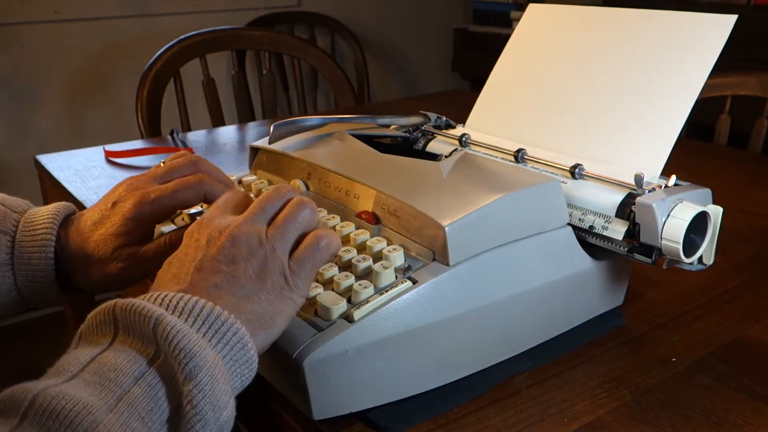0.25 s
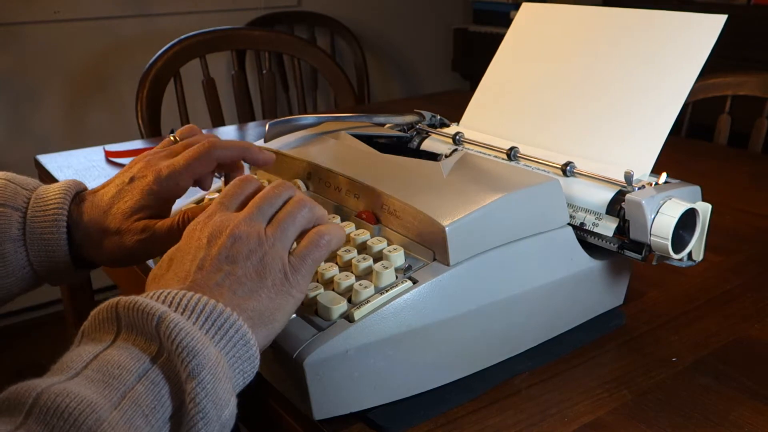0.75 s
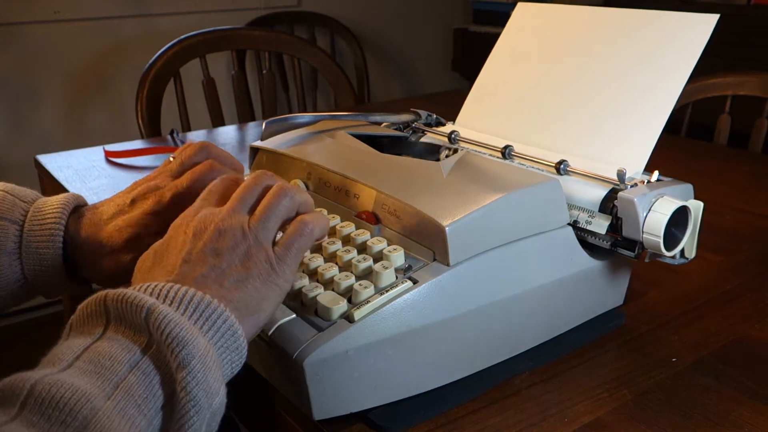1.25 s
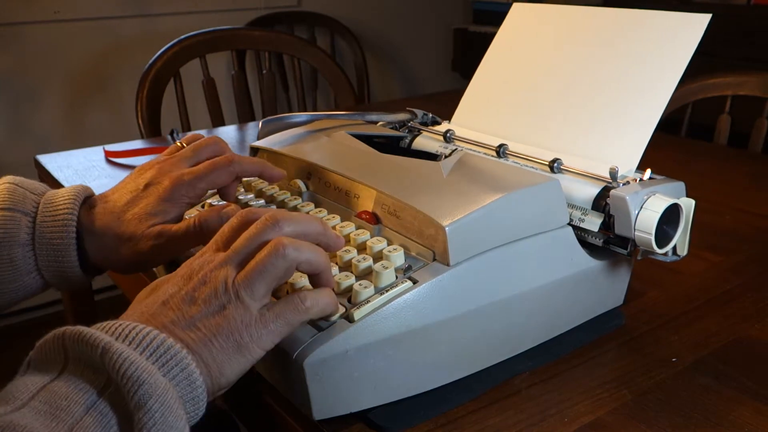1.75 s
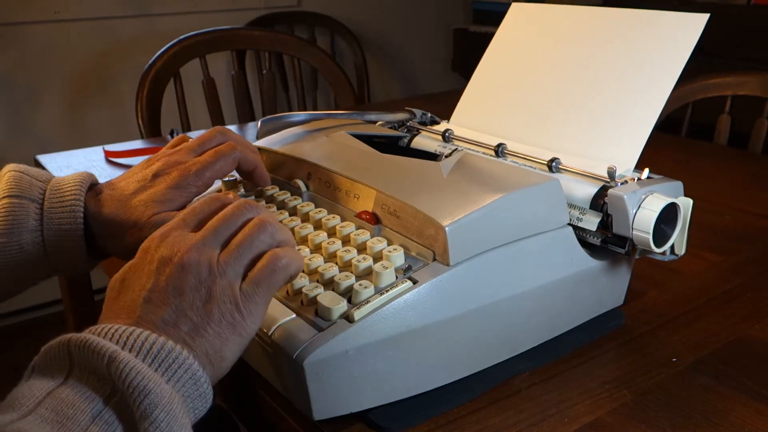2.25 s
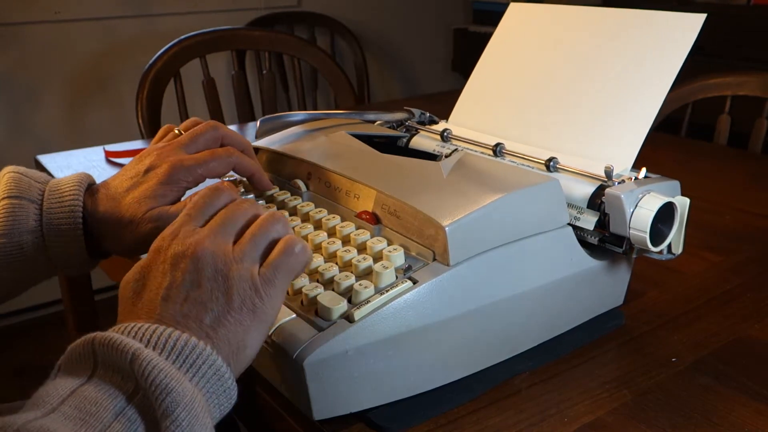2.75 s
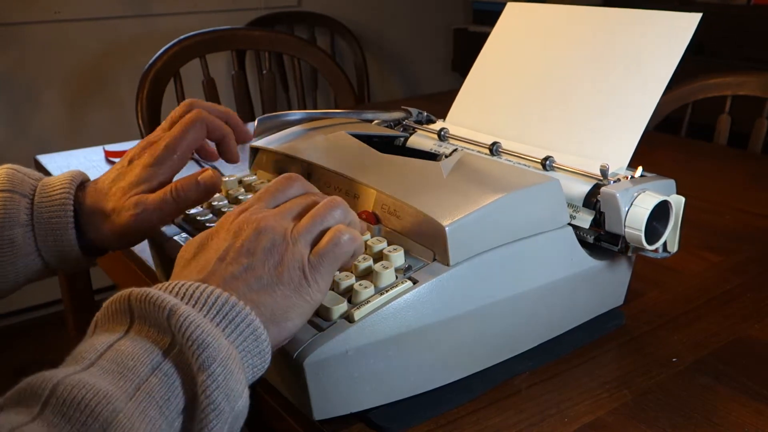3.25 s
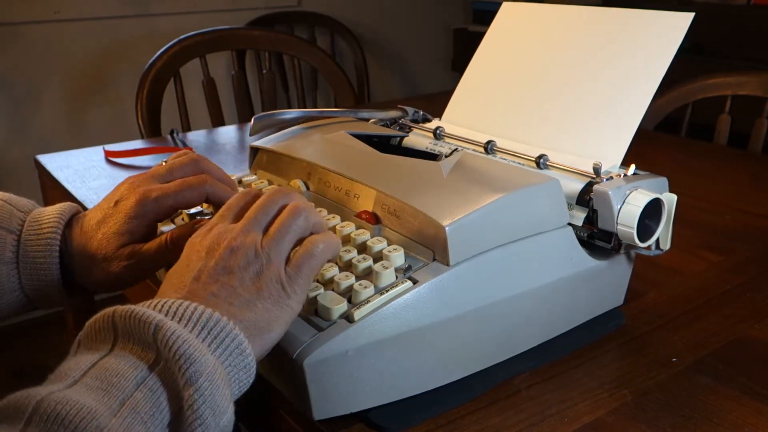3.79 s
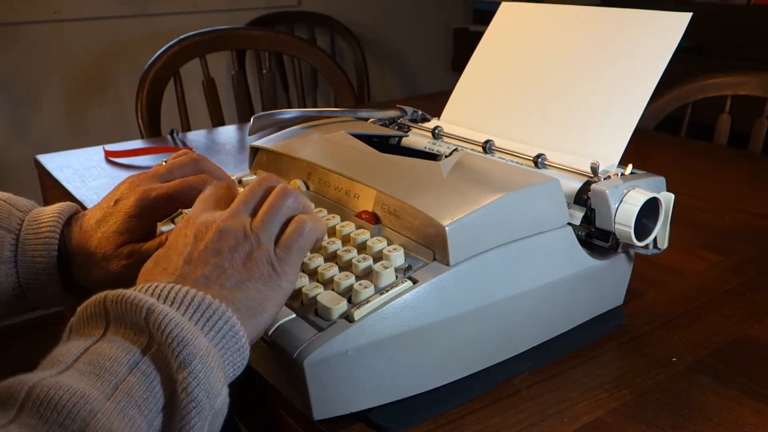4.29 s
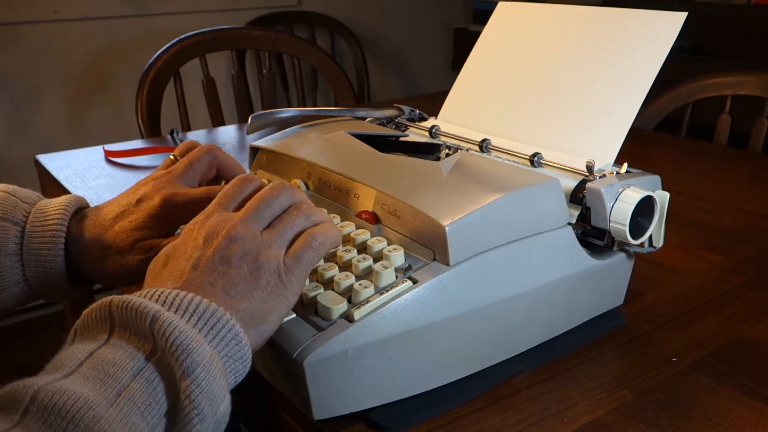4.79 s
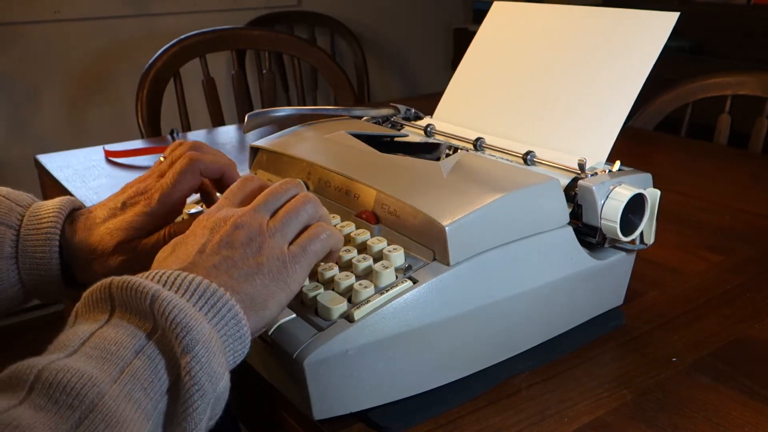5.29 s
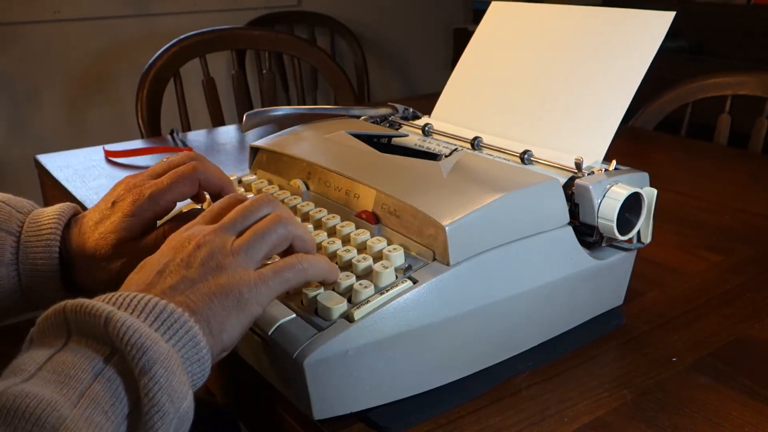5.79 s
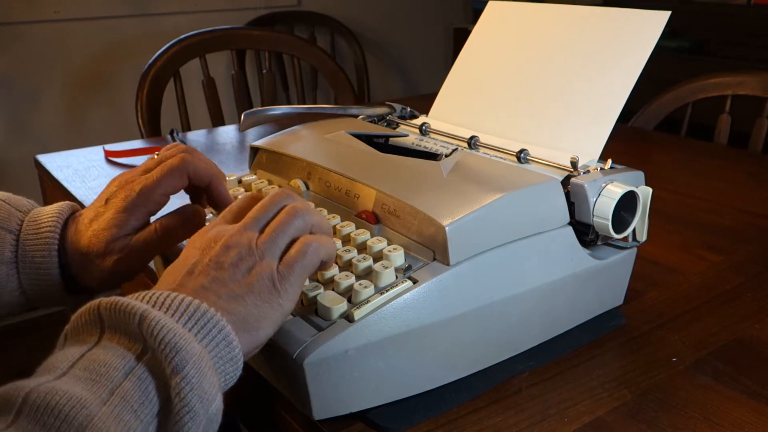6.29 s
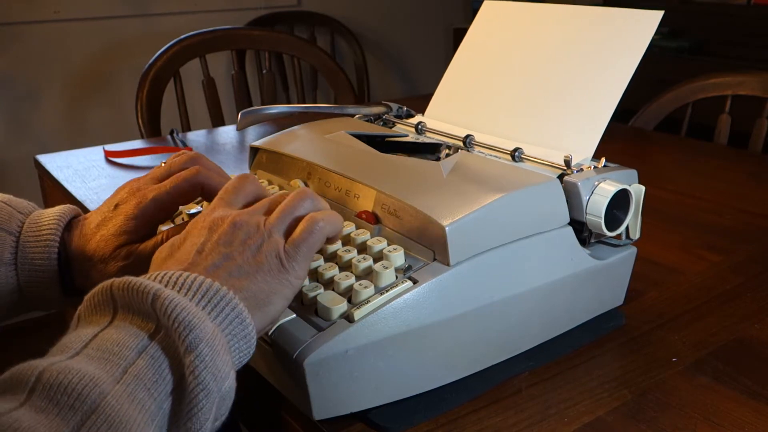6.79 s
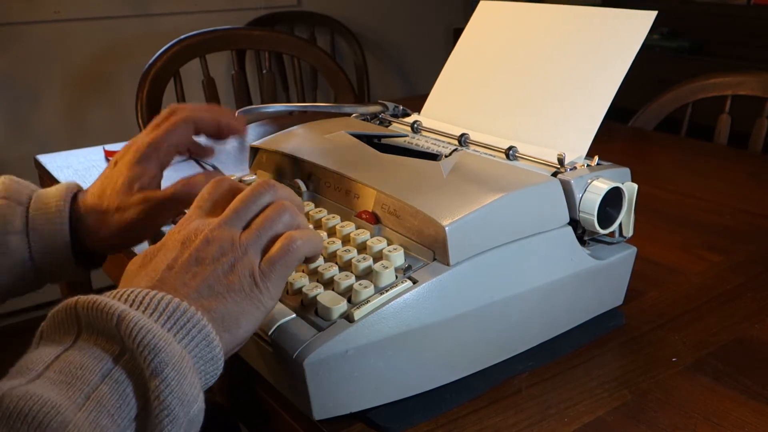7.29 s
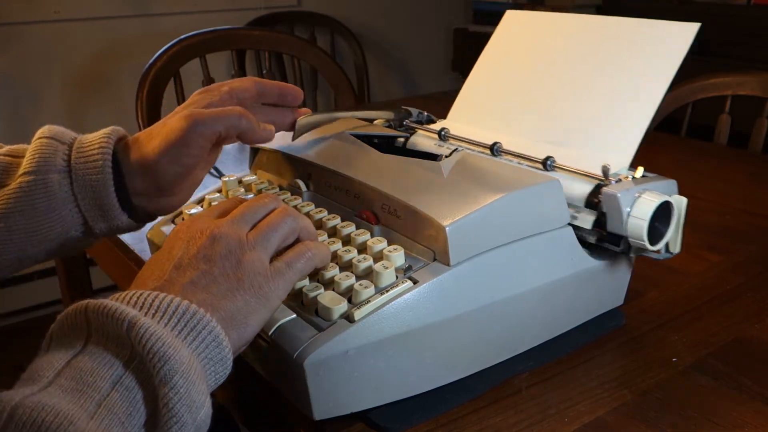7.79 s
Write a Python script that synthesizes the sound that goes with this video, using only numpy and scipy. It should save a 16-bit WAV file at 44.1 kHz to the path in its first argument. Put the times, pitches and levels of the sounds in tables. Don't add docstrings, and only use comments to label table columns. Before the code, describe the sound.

Crisp typewriter keystrokes with metallic ringing and space bar clacks come in short runs in a quiet room, ending with a carriage return.

```python
import sys
import numpy as np
from scipy import signal
from scipy.fft import rfft, irfft, next_fast_len
from scipy.io import wavfile
from scipy.ndimage import uniform_filter1d, map_coordinates

SR = 44100
rng = np.random.default_rng(int(sys.argv[2]) if len(sys.argv) > 2 else 0)


def pcm_store(signal):
    levels = np.round(np.clip(np.atleast_2d(signal), -1, 1) * 32767)
    wavfile.write(sys.argv[1], SR, levels.astype(np.int16).T)


def level_to_linear(level):
    exponent = np.asarray(level, float) / 20
    return 10 ** exponent


N = 354563

# (frequency [Hz], peak level [dB])
MOTOR_LINES = [(120, -62.5), (484, -70), (720, -60), (840, -69), (959, -69), (1012, -80)]
# (frequency [Hz], level per Hz [dB])
MOTOR_AIR = [(20, -45), (60, -36), (200, -5), (330, -7.5), (480, -3), (800, 0.5), (1300, -4.5), (2200, -44),
             (2700, -11.5), (5000, -12), (11500, -17.5)]
# (frequency [Hz], width [Hz], level [dB])
BELT_PARTS = [(1900, 160, 7.5), (2990, 66, -18), (4400, 240, -11), (6500, 100, -19), (7400, 500, -25),
              (9200, 220, -1)]
# (frequency [Hz], side minus middle [dB])
PORT_WIDTH = [(60, -13), (130, -27), (270, -13.5), (580, -14), (1220, -10), (2600, -7), (5520, -2),
              (11700, 2)]
# (frequency [Hz], time to fall 60 dB [s])
ROOM_DECAY = [(100, 0.71), (700, 0.46), (2000, 0.32), (5000, 0.22), (10000, 0.17)]

# (time [s], peak level [dB], cam trips earlier by [ms], bar is back after [ms])
SLAPS = [(0.055, -4.6, 53.6, 59), (0.3398, -4.5, 29.1, 56), (0.5523, -5.4, 31.3, 56),
         (0.6302, -5.7, 29.8, 62), (0.7179, -5.5, 30.4, 61), (1.0857, -5.4, 29.7, 73),
         (1.1625, -5.9, 28.1, 56), (1.2932, -6.7, 31.2, 56), (1.4017, -6.8, 30.7, 56),
         (1.8802, -6.9, 31, 58), (2.3446, -6.9, 33.1, 65), (2.8646, -7.5, 32.1, 56),
         (3.1449, -6.8, 29.8, 56), (3.3876, -5.8, 30.9, 58), (3.5375, -6.2, 30.7, 63),
         (4.1517, -6.2, 29.3, 57), (4.3847, -4.5, 31.7, 57), (4.823, -5.5, 30, 89),
         (4.9005, -5.6, 31.8, 56), (4.9989, -5.4, 30, 58), (5.3042, -6.6, 31, 56), (5.4218, -5.6, 39.3, 50),
         (6.0344, -6.9, 36.9, 63), (6.1475, -5.2, 41.5, 56), (6.546, -4.6, 31.2, 56),
         (6.6433, -4.1, 34.3, 53), (6.8244, -4.6, 30.4, 52), (7.0053, -4.1, 30.1, 56),
         (7.221, -7.5, 32.8, 51)]
# (cam level [dB], escapement spring level [dB], fall-back clack level [dB])
KEY_CYCLES = [(-12, -17, -34), (-15.5, -14, -18), (-15, -20, -29), (-11, -15, -30), (-15, -19, -26),
              (-16, -13.5, -28), (-13.5, -26, -19), (-14.5, -17, -34), (-15.5, -15, -22),
              (-17.5, -17.5, -26), (-17.5, -17, -21), (-21.5, -20, -39), (-15.5, -15.5, -18),
              (-16.5, -15, -18), (-18, -14.5, -35), (-18.5, -18, -22), (-17.5, -13.5, -21.5),
              (-15, -19, -36), (-19, -19, -18), (-15.5, -28, -15.5), (-16, -26, -38), (-16, -17, -13.5),
              (-20, -35, -37), (-14.5, -28, -16), (-17, -39, -35), (-15, -25, -15), (-16.5, -26, -15.5),
              (-18, -28, -19), (-19, -19, -19)]
# (time [s], brightness [dB])
LINE_BRIGHTNESS = [
    (0.4, -7),
    (1.2, -1),
    (4.3, -2),
    (6.9, 5),
]
# (frequency [Hz], level [dB], rise [s], time to fall 60 dB [s], right minus left [dB])
SLAP_MODES = [(2250, -1, .0006, .009, 3), (2870, 4, .0006, .009, 3.5), (3900, -3, .0003, .007, 3),
              (5900, -4, .00005, .007, 3), (7200, -5, .00005, .006, 0), (9800, -12, .00005, .005, -1)]
# (frequency [Hz], level per Hz [dB])
LINKAGE_STEEL = [(350, -15.5), (700, -14.5), (1200, -4.5), (2000, 0.5), (3200, 0.5), (4500, -2),
                 (7000, -5.5), (10000, -9), (11500, -7)]
# (frequency [Hz], width [Hz], level [dB])
LEVER_MODES = [(2190, 45, -29), (3275, 166, 8.5), (4200, 46, -44), (6080, 67, -39.5)]
# (frequency [Hz], width [Hz], level [dB])
HOUSING_MODES = [(190, 200, -23), (387, 160, -11.5), (538, 113, -5.5), (676, 26, -2.5), (823.5, 52, 0.5),
                 (940, 128, -2), (1160, 460, -8)]

# (time [s], let go after [ms], peak level [dB], spring level [dB])
SPACES = [(0.183, 81.7, -11, -14), (0.8577, 71.1, -13.5, -16), (1.5501, 82.5, -12.5, -12.5),
          (3.7696, 73.6, -12, -19), (4.5432, 80.1, -14.5, -19), (6.317, 89.8, -11.5, -20)]
# (level over the bar [dB], thump [dB], rattle [dB], rattle time to fall 60 dB [s], brightness [dB])
SPACE_STAGES = [
    (-1.14, -18.5, -9, 0.18, -0.4),
    (-2.55, -15, -12, 0.32, -0.1),
    (-1.1, -48, -12, 0.094, 6.5),
]
# (time [s], peak level [dB], thump [dB], rattle [dB], rattle time to fall 60 dB [s])
STOPS = [(0.2305, -30, -27, -13, 0.096), (1.7268, -5.5, -20.5, -10.5, 0.078),
         (1.7584, -13.5, -17.5, -5.5, 0.23), (1.765, -14, -29, -13.5, 0.14), (2.0823, -10, -17, -11, 0.19),
         (2.1276, -12.5, -22.5, -16.5, 0.26), (2.8537, -12, -34, -8.5, 0.063), (3.524, -9, -38, -13, 0.29),
         (6.0186, -11, -27.5, -9, 0.045), (6.0582, -27, -16, -33, 0.093), (6.369, -23, -15, -25, 0.09),
         (7.2082, -15, -14, -3.5, 0.13), (7.5622, -17, -29.5, -9, 0.047), (7.624, -15, -21, -8.5, 0.15),
         (7.9417, -6, -22.5, -8.5, 0.06), (7.9556, -9, -28, -7, 0.1)]
# (time [s], peak level [dB], pitch [Hz], key travel level [dB])
PRESSES = [(0.5023, -22.5, 7800, -7), (0.843, -27, 2100, 0), (1.0378, -22, 7600, -6),
           (1.535, -26, 3300, -4), (1.716, -30, 2800, 2), (2.071, -30, 7500, 3.5), (2.303, -28, 5800, 0),
           (2.819, -37, 4700, 1), (3.109, -33, 2000, 3), (3.344, -42, 1900, 5), (3.747, -26, 4070, -1),
           (4.1038, -20.5, 9450, -12), (4.342, -34, 7700, 2), (4.7737, -22.5, 10300, -7.5),
           (5.2578, -23.5, 10200, -5.5), (5.9826, -22, 9500, -9), (6.294, -22, 3500, -8),
           (6.499, -32, 5500, 1), (6.776, -22.5, 8900, -14), (6.955, -31, 1800, 3), (7.174, -36, 3000, 0),
           (7.6131, -25, 3180, 2)]
# (time [s], peak level [dB], pitch [Hz])
BRUSHES = [(2.598, -43, 1980), (2.7457, -44, 1800), (5.252, -32, 1900), (5.6484, -37, 1900),
           (5.793, -38, 5600), (5.905, -40, 9000), (7.529, -33, 7000), (7.533, -29, 3140),
           (7.543, -26, 2600), (7.55, -21.5, 2740), (7.7144, -34, 3300), (7.726, -27, 3000),
           (7.7365, -18, 3800)]

# (time [s], level [dB], pitch [Hz], time to fall 60 dB [s])
CARRIAGE_CLUNK = [
    (7.632, -21, 2600, .06),
]
# (time [s], level [dB])
SLIDE = [
    (7.66, -51.5),
    (7.688, -41.5),
    (7.768, -31),
    (7.87, -29.5),
    (7.934, -31.5),
    (7.945, -24),
]
# (frequency [Hz], level per Hz [dB])
RAIL_NOISE = [(59, -66), (100, -32), (302, -14), (603, -3.5), (895, -2.5), (2130, -4), (3560, 0),
              (4700, -1), (8840, -3.5), (11200, -6.5), (14600, -42), (22000, -120)]
# (frequency [Hz], width [Hz], level [dB])
ROLLER_MODES = [(920, 99, -9), (2950, 64, 1), (3530, 120, -2), (5600, 150, -3), (8200, 600, -20)]

STEP_S = .0375


def unit(x):
    return x / np.sqrt(np.mean(x ** 2) + 1e-20)


def along(points, hz):
    f, v = np.transpose(points)
    return np.interp(np.log(hz + 1), np.log(f + 1), v)


def filtered(x, response):
    m = next_fast_len(N + SR // 2)
    return irfft(rfft(x, m) * response(np.fft.rfftfreq(m, 1 / SR)), m)[..., :N]


def modes(table, f):
    total = 0
    for k, (centre, width, db) in enumerate(table):
        resonance = 1j * f * width / (centre * centre - f * f + 1j * f * width)
        total = total + (-1) ** k * level_to_linear(db) * resonance
    return total


def ports(pair, spread_db):
    side = filtered(pair[1], lambda hz: level_to_linear(along(PORT_WIDTH, hz) + spread_db))
    return np.array([pair[0] + side, pair[0] - side])


def add(track, s, piece):
    part = track[..., max(round(s * SR), 0):][..., :piece.shape[-1]]
    part += piece[..., :part.shape[-1]]


def wander(rate):
    return map_coordinates(rng.standard_normal(1000), [np.arange(N) / SR * rate])


def chatter(power, colour, spiky_db):
    sizes = np.repeat(np.minimum(rng.exponential(1, N // 24 + 1), 3.5), 24)[:N]
    clumps = map_coordinates(rng.standard_normal(2000), [np.arange(N) / SR * 200])
    collisions = rng.standard_normal((2, N)) * level_to_linear(spiky_db * sizes + 1.5 * clumps)
    pair = filtered(collisions, colour)
    return np.sqrt(power) * pair / np.std(pair)


def puff(noise, hz, sharp):
    b, a = signal.iirpeak(hz, sharp, SR)
    return unit(signal.lfilter(b, a, signal.lfilter(b, a, noise)))


def strikes():
    return [(s, db, np.interp(s, *np.transpose(LINE_BRIGHTNESS))) for s, db, *_ in SLAPS]


def contacts():
    ms = .001
    rows = []
    for (s, _, bright_db), (_, _, early_ms, _), (cam_db, *_) in zip(strikes(), SLAPS, KEY_CYCLES):
        rows.append((s - early_ms * ms, cam_db, -32.5 - cam_db, -11, 0.5, 0.9 + 0.17 * bright_db))
    for s, up_ms, db, _ in SPACES:
        for late, (gain_db, *rest) in zip((0, STEP_S, up_ms * ms), SPACE_STAGES):
            rows.append((s + late, db + gain_db, *rest))
    return rows + [(*row, -0.4) for row in STOPS]


def motor():
    t = np.arange(N) / SR
    lines = np.zeros(N)
    for hz, db in MOTOR_LINES:
        lines += level_to_linear(db + 2.2 * wander(9)) * np.sin(2 * np.pi * hz * t + .25 * wander(9))
    air = unit(filtered(rng.standard_normal((2, N)), lambda hz: level_to_linear(along(MOTOR_AIR, hz))))
    flutter_db = 0.98 * wander(120) + 3.5 * np.sin(2 * np.pi * 49 * t + wander(9))
    shaking = level_to_linear(flutter_db) * rng.standard_normal((2, N))
    belt = unit(filtered(shaking, lambda hz: modes(BELT_PARTS, hz)))
    whirr_db = -47.5
    whirr = level_to_linear(whirr_db - 11.0) * air + level_to_linear(whirr_db - 13.5) * belt
    return lines + ports(whirr, spread_db=0.5)


def linkage():
    power = np.zeros((3, N))
    t = np.arange(SR // 3) / SR
    for (s, db, bright_db), (*_, back_ms), (*_, back_db) in zip(strikes(), SLAPS, KEY_CYCLES):
        hold = back_ms / 1000
        late = np.maximum(t - hold, 0)
        shake = level_to_linear(-24.5 - 60 * late / 0.16) ** 2 * (1 - np.exp(-t / 0.028))
        clack = (t >= hold) * level_to_linear(back_db - 60 * late / .025) ** 2
        add(power, s, (shake + clack) * level_to_linear([[-.15 * bright_db], [0.071 + 0.037 * bright_db], [-11]]) ** 2)
        snap = level_to_linear(db - 19.0 - 60 * t / 0.14) ** 2
        add(power, s - .0048, snap * level_to_linear([[.1], [-2.1], [-9]]) ** 2)
        add(power, s + .0046, snap * level_to_linear([[1.2], [6.5 + 0.11 * bright_db], [-21]]) ** 2)
    for s, db, thump_db, rattle_db, t60, bright_db in contacts():
        rise = 1 - np.exp(-(t / 0.00073) ** 2)
        knock = rise * level_to_linear(db + thump_db - 3.3 - 60 * t / 0.28) ** 2
        click = level_to_linear(db - 10 - 60 * t / 0.0074) ** 2
        rattle = level_to_linear(db + rattle_db - 60 * t / t60) ** 2
        steel = rise * (click + rattle)
        add(power, s, np.array([steel, steel * level_to_linear(bright_db) ** 2, knock]))

    def low(f):
        return 1 / (1 + (f / 4500) ** 6)

    def levers(f):
        return level_to_linear(along(LINKAGE_STEEL, f)) * (1 + 0.91 * modes(LEVER_MODES, f))

    body = chatter(power[0], lambda f: levers(f) * np.sqrt(low(f)), spiky_db=1.5)
    fizz = chatter(power[1], lambda f: levers(f) * np.sqrt(1 - low(f)), spiky_db=-1.5)
    housing = chatter(power[2], lambda f: modes(HOUSING_MODES, f), spiky_db=4.0)
    return level_to_linear(-3.5) * body + level_to_linear(1.0) * fizz + housing


def cover_knocks():
    out, t = np.zeros((2, N)), np.arange(SR // 10) / SR
    for s, db, thump_db, *_ in contacts():
        shake = rng.standard_normal((2, len(t)))
        envelope = level_to_linear(db + thump_db - 3.0 - 60 * t / 0.16) * (1 - np.exp(-t / 0.00049))
        add(out, s, envelope * puff(shake, 1003, sharp=1.8))
    return out


def room(x):
    out, size = np.zeros((2, N)), SR // 2
    for start in range(0, N, size):
        hz, t, z = signal.stft(rng.standard_normal((2, SR // 2)), SR, nperseg=256)
        fade = level_to_linear(-60 * t / along(ROOM_DECAY, hz)[:, None])
        tail = signal.istft(z * fade, SR, nperseg=256)[1]
        wet = signal.fftconvolve(x[None, start:start + size], tail / np.linalg.norm(tail[0]), axes=1)
        add(out, start / SR + .006, wet)
    return out


def duck():
    dip_db, t = np.zeros(N), np.arange(SR // 20) / SR
    for s, *_ in SLAPS:
        add(dip_db, s - .0025, -11 * np.exp(-np.maximum(t - .0045, 0) / .0015))
    return level_to_linear(uniform_filter1d(dip_db, size=20))


def slaps():
    out, t = np.zeros((2, N)), np.arange(SR // 100) / SR
    for s, db, bright_db in strikes():
        ring = np.zeros((2, len(t)))
        for hz, level, rise, t60, lean in SLAP_MODES:
            loud, sharp = rng.standard_normal(2)
            mode_db = level + (hz > 4500) * (bright_db + 1.5) + 1.5 * loud
            swell = level_to_linear(mode_db - 60 * t / t60) * (1 - np.exp(-(t / rise) ** 2))
            tone = np.sin(2 * np.pi * hz * (1 + .035 * sharp) * t)
            ring -= level_to_linear([[-lean / 2], [lean / 2]]) * swell * tone
        add(out, s, level_to_linear(db - .8) * ring / np.abs(ring.mean(axis=0)).max())
    return out


def springs():
    out, t = np.zeros((2, N)), np.arange(SR // 4) / SR
    starts = [(s + .027, db) for (s, *_), (_, db, _) in zip(SLAPS, KEY_CYCLES)]
    starts += [(s + STEP_S, db) for s, *_, db in SPACES]
    rows = [(s, db, 3120 + 70 * rng.standard_normal(), 0.15) for s, db in starts]
    for s, db, hz, t60 in rows + list(CARRIAGE_CLUNK):
        shake = rng.standard_normal((2, len(t))) + 6 * (t == 0)
        fade = level_to_linear(-60 * t / t60) + level_to_linear(-13 - 60 * t / 0.38)
        add(out, s, level_to_linear(db - 10.5) * fade * puff(shake, hz, sharp=5.9))
    return out


def table_top():
    out, t = np.zeros((2, N)), np.arange(SR // 5) / SR
    rows = [(s + .035, -44.5) for s, *_ in SLAPS]
    rows += [(s + 0.01926, db + thump_db - 11.5) for s, db, thump_db, *_ in STOPS]
    for s, db in rows:
        hz = 171 * level_to_linear(1.4 * rng.standard_normal())
        shake = rng.standard_normal((2, len(t)))
        envelope = level_to_linear(db - 4 - 60 * t / 0.28) * (1 - np.exp(-t / 0.0048))
        add(out, s, envelope * puff(shake, hz, sharp=1.9))
    return out


def finger_ticks():
    out, t = np.zeros((2, N)), np.arange(SR // 20) / SR
    for s, db, hz, travel_db in list(PRESSES) + [(*brush, -16) for brush in BRUSHES]:
        shake = rng.standard_normal((2, 2, len(t)))
        touch = level_to_linear(-60 * t / .035) * puff(shake[0], hz, sharp=1.3)
        travel = level_to_linear(travel_db - 60 * t / 0.78) * puff(shake[1], 2400, sharp=0.19)
        add(out, s, level_to_linear(db - 10.5) * (1 - np.exp(-t / 0.00065)) * (touch + travel))
    return out


def carriage():
    s, db = np.transpose(SLIDE)
    slide_db = np.interp(np.arange(N) / SR, s, db, -120, -120)
    power = level_to_linear(slide_db + 0.72 * wander(90)) ** 2

    def colour(f):
        return level_to_linear(along(RAIL_NOISE, f)) * (1 + 1.3 * modes(ROLLER_MODES, f))

    return chatter(power, colour, spiky_db=2.0)


def scene():
    machine = linkage() + cover_knocks() + springs() + table_top() + finger_ticks() + carriage()
    echoes = level_to_linear(-7) * room(machine[0])
    near = ports(machine, spread_db=-4.5) + ports(echoes, spread_db=0.7)
    busy = uniform_filter1d(np.abs(near[0]), size=2000)
    hum = motor() / (1 + 25 * busy)
    return duck() * (near + hum) + slaps()


def band_limit(x):
    return signal.sosfilt(signal.butter(12, 12330, fs=SR, output="sos"), x)


def record(dry):
    held = dry / (1 + np.abs(dry / .8) ** 6) ** (1 / 6)
    top_hz = 11150

    def response(hz):
        edge_hz = [top_hz - 500, top_hz - 100, top_hz + 30, top_hz + 1500]
        treble_limit = level_to_linear(np.interp(hz, edge_hz, [0, -4, -36, -75]))
        bass_cut = hz ** 2 / (hz ** 2 + 75 ** 2)
        return treble_limit * bass_cut

    mix = filtered(held, response) * level_to_linear([[-.3], [.3]])
    return band_limit(mix)


dry = scene()
out = record(dry)
pcm_store(out)
```